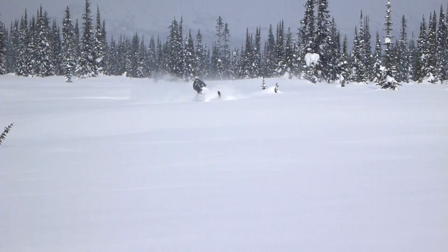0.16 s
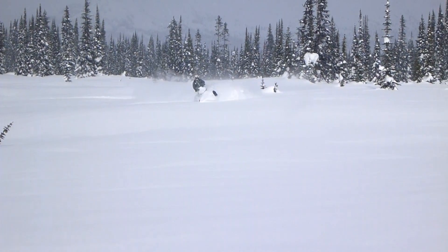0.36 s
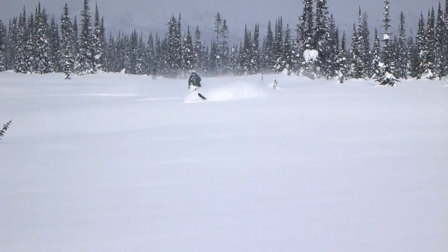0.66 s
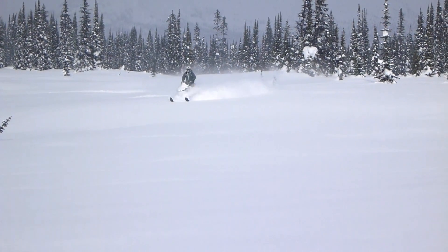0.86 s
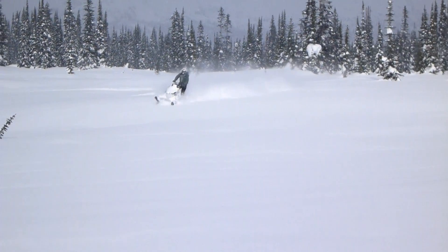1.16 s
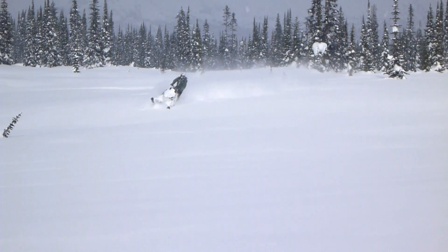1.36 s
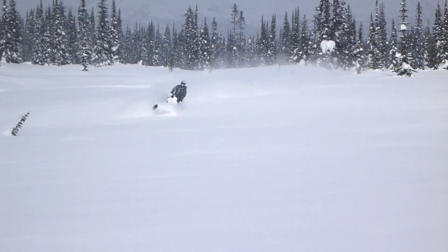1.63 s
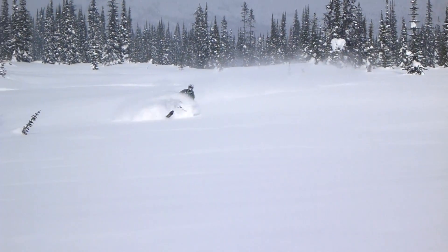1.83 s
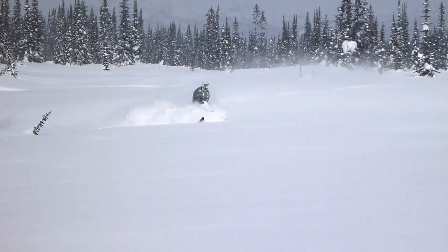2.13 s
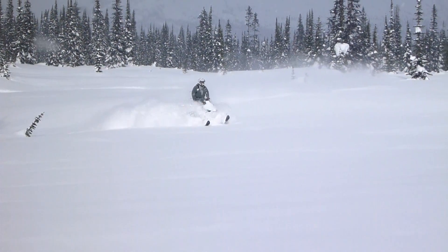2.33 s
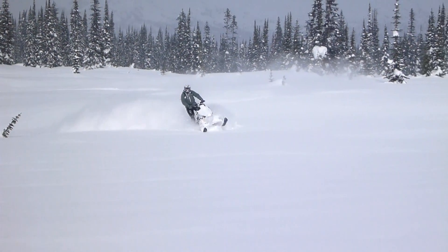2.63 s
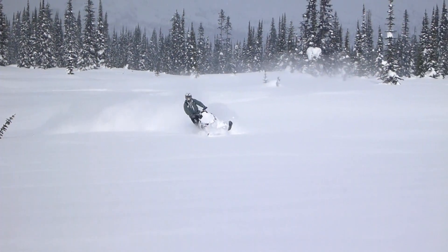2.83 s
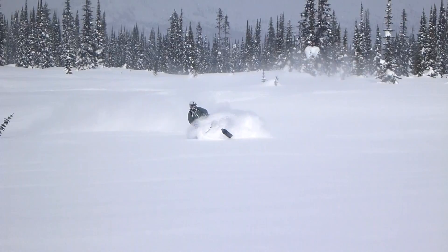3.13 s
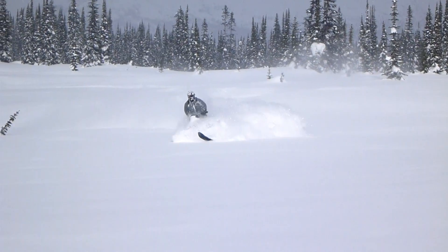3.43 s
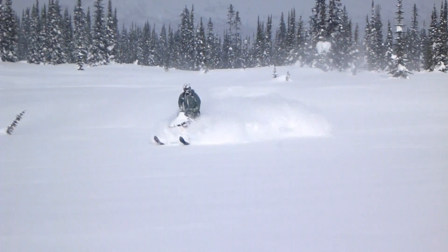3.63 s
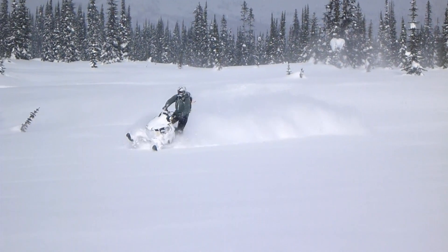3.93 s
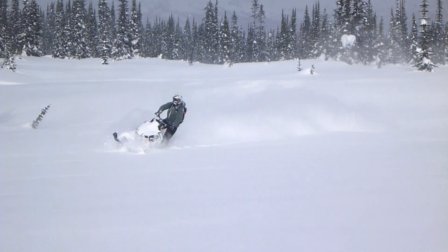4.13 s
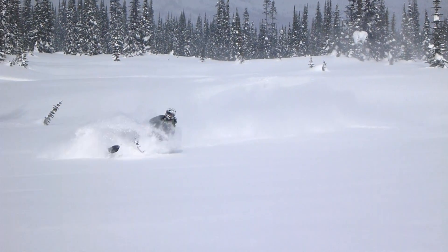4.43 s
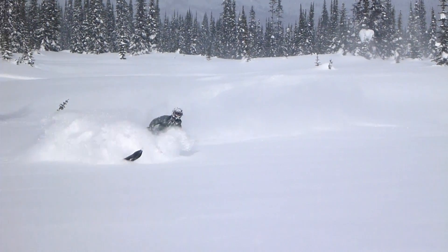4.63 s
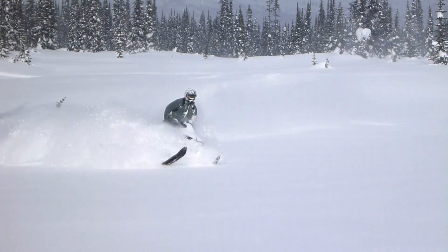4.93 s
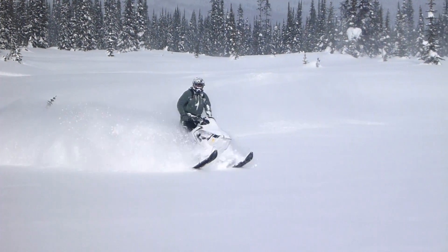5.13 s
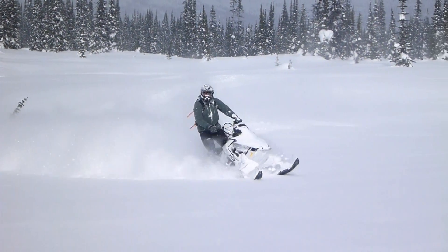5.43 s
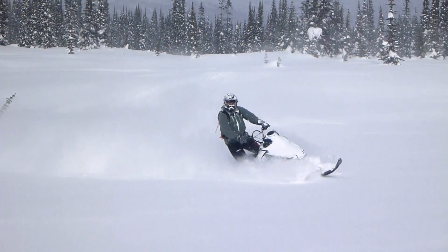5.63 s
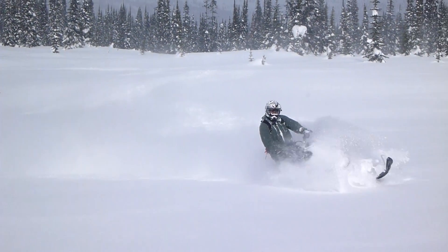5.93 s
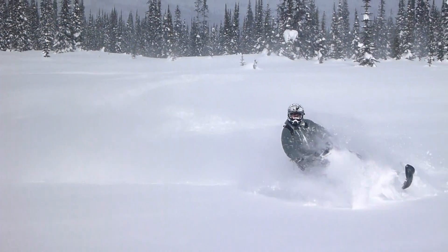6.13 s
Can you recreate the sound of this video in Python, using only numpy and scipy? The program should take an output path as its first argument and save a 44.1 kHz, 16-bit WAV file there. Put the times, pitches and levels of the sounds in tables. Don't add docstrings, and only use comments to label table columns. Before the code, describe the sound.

A two-cylinder snowmobile runs at nearly constant high revs in an open snowy field. It starts muffled beneath thumping wind, then barks out raspy and bright just after one second, dulls, and surges again near four and five seconds. Tree-line echoes trail the bursts. A handheld outdoor microphone catches buffeting gusts, and powder hisses softly as the machine gets close.

```python
import sys
import numpy as np
from scipy import signal
from scipy.fft import rfft, irfft, next_fast_len
from scipy.io import wavfile
from scipy.ndimage import uniform_filter1d

SR = 44100
rng = np.random.default_rng(int(sys.argv[2]) if len(sys.argv) > 2 else 0)


def unload_audio(sound):
    columns = np.transpose(np.atleast_2d(sound))
    steps = np.round(np.clip(columns, -1, 1) * 32767)
    wavfile.write(sys.argv[1], SR, steps.astype(np.int16))


def field_ratio(decibels):
    return 10 ** (np.asarray(decibels, dtype=float) / 20)


N = 276941

# time in seconds, load in dB.
TRACK_LOAD = [(0, -1), (1.1, 3), (1.5, -4), (2.4, -3), (2.6, 6), (3, 2.5), (3.4, 0.3), (3.7, 5.5),
              (4.2, -1.5), (5.3, 1.5), (5.6, 0.2), (6.28, 4)]


def evened(x):
    return x / np.sqrt(np.mean(x ** 2) + 1e-20)


def steadied(x):
    power = uniform_filter1d(uniform_filter1d(x ** 2, 3000), 3000)
    return x / np.sqrt(abs(power) + 1e-12)


def read(points, hz):
    f, value = np.transpose(points)
    return np.interp(np.log(hz + 1), np.log(f + 1), value)


def columns(rows):
    s, *values = np.transpose(rows)
    return [np.interp(np.arange(N) / SR, s, v) for v in values]


def peaks(rows, db, rise, fall, sag=0):
    step = 64
    t = np.arange(0, N + step, step)[:, None] / SR
    start, length = np.transpose(rows)[:2]
    before = rise * np.maximum(start - t, 0)
    after = fall * np.maximum(t - start - length, 0)
    each = db - before - after - sag * np.clip(t - start, 0, length)
    return np.interp(np.arange(N) / SR, t[:, 0], each.max(1))


def shaped(x, gain):
    size = next_fast_len(N + 8192)
    return irfft(rfft(x, size) * gain(np.fft.rfftfreq(size, 1 / SR)), size)[:N]


def coloured(points):
    return shaped(rng.standard_normal(N), lambda f: field_ratio(read(points, f)))


def causal(points):
    log_gain = np.log(field_ratio(read(points, abs(np.fft.fftfreq(4096, 1 / SR)))))
    return np.fft.ifft(np.exp(np.conj(signal.hilbert(log_gain)))).real[:2048]


def drift(hz, count=1):
    step = 64
    size = N // step + 2
    z = rfft(rng.standard_normal((count, size)))
    slow = irfft(z / (1 + (np.fft.rfftfreq(size, step / SR) / hz) ** 2), size)
    return np.array([np.interp(np.arange(N), np.arange(size) * step, evened(v)) for v in slow])


def add(mix, s, sound):
    part = mix[round(s * SR):][:len(sound)]
    part += sound[:len(part)]


def engine():
    # time in seconds, firing rate in Hz.
    speed = [(0, 268.9), (.58, 282.9), (1.14, 280.5), (1.31, 283), (1.45, 283), (1.78, 285.3),
             (2.33, 269.3), (2.55, 285.6), (2.76, 287.3), (3.34, 274.9), (3.92, 286), (4.1, 285.3),
             (4.36, 279.7), (4.85, 270.8), (5.02, 281.2), (5.28, 285.5), (5.88, 277.7), (6.28, 280.6)]
    # time in seconds, share 0-1.
    unsteadiness = [(0, .7), (1.1, .6), (1.25, .05), (1.75, .08), (1.98, .75), (2.45, .9), (2.55, .15), (3, .3),
                    (3.5, .5), (3.8, .05), (4.35, .08), (4.5, .8), (4.9, .8), (5, .05), (5.5, .1), (6.28, .2)]
    turns = np.cumsum(columns(speed)[0]) / SR
    burble = columns(unsteadiness)[0]
    scatter = drift(4.7, count=14)
    beating = .6 * burble * drift(32, count=16)
    sputter = field_ratio((.7 + 5 * burble ** 2) * drift(130)[0])
    band_levels_db, fourth_db, seventh_db, hum_levels_db = order_levels()
    bark = exhaust(turns, burble, scatter, beating, sputter, band_levels_db, fourth_db, seventh_db)
    hum = shell_hum(turns, beating, hum_levels_db)
    return bark, hum + crank(turns, scatter)


def exhaust(turns, burble, scatter, beating, sputter, band_levels_db, fourth_db, seventh_db):
    # frequency in Hz, level in dB.
    open_outlet = [(200, -25.5), (1100, 10.5), (1420, 7.5), (1700, -0.5), (2270, -6), (2550, -3.5),
                   (3700, -2), (4500, -8.5), (5400, -10), (8050, -27), (9600, -31), (10900, -22),
                   (15600, -46.5)]
    firing = np.round(turns).astype(int)
    uneven, late = rng.standard_normal((firing[-1] + 1, 2)).T
    strength = 1 + .05 * uneven[firing] + .04 * (-1.) ** firing
    jittered = turns + .002 * late[firing] + .004 * drift(30)[0]
    orders = firing_orders(jittered, burble, scatter, beating, sputter)
    pulses = sum(orders[k] for k in orders if k not in (4, 7))
    colour = causal(open_outlet)
    outlet = signal.oaconvolve(-strength * evened(pulses) + gas_jet(turns, sputter), colour)[:N]
    bark = sum(field_ratio(db) * steadied(band) for db, band in zip(band_levels_db, outlet_bands(outlet)))
    for k, db in (4, fourth_db), (7, seventh_db):
        bark += field_ratio(db) * steadied(signal.oaconvolve(-strength * orders[k], colour)[:N])
    return bark


def firing_orders(jittered, burble, scatter, beating, sputter):
    orders = {}
    for k in range(4, 55):
        beats = (1 + beating[k - 2]) / np.sqrt(1 + burble ** 2) if k < 10 else sputter
        wave = np.cos(2 * np.pi * k * jittered + beating[min(k + 6, 15)]) * beats
        waver_db = min(.08 * k, 1.7) * scatter[min(k, 5 + k // 7)]
        orders[k] = wave * field_ratio(waver_db)
    return orders


def gas_jet(turns, sputter):
    puff = np.exp(-(turns % 1) / .5) * rng.standard_normal(N) * sputter
    return .5 * shaped(puff, lambda f: 1 / np.sqrt(1 + (4000 / (f + 1)) ** 2))


def outlet_bands(outlet):
    # delay in ms, drift of the delay in ms, level in dB.
    bounces = [(.2, .07, -11), (.6, .12, -12), (1.8, .1, -10), (2.7, .3, -12)]

    def below(x, edge_hz):
        return shaped(x, lambda f: 1 / (1 + (f / edge_hz) ** 16))

    bright = outlet.copy()
    for (ms, drift_ms, db), sway in zip(bounces, drift(2.4, count=4)):
        delay = abs(ms + drift_ms * sway) * SR / 1000
        bright += field_ratio(db) * np.interp(np.arange(N) - delay, np.arange(N), outlet)
    low, mid, high = below(outlet, 1900), below(outlet, 2900), below(bright, 7850)
    return low, mid - low, high - below(bright, 2900), bright - high


def shell_hum(turns, beating, levels_db):
    lagged = turns - 0.1
    hum = sum(field_ratio(db) * np.sin(2 * np.pi * (k + 1) * lagged + 0.59 * k * beating[k])
              for k, db in enumerate(levels_db))
    return np.sqrt(2) * hum


def crank(turns, scatter):
    half = sum(np.cos(np.pi * k * turns + k * k) * field_ratio(2.1 * scatter[k // 2]) / k ** 0.34
               for k in range(3, 18, 2))
    return field_ratio(-51 + 2.3 * columns(TRACK_LOAD)[0]) * evened(half)


def order_levels():
    # time in seconds, level in dB, lean towards the second order in dB.
    shell = [(0, -48, 1), (.9, -44.5, 4.5), (1.14, -42.5, 7), (1.3, -33.5, -1.5), (1.45, -49, 12.5),
             (2.04, -39, 11.5), (2.4, -40, -7), (2.76, -35.5, 6.5), (3.1, -41.5, 4), (3.75, -45.5, 9.5),
             (3.86, -38.5, 9.5), (4.07, -43, -6.5), (4.35, -43.5, 13.5), (4.56, -33, 2), (4.9, -34, -15),
             (5, -26.5, 8), (5.4, -35, -4), (6.28, -34, 3)]
    # start in seconds, length in seconds, level in dB.
    rings = [
        [(1.27, 0.047, -36), (1.98, 0.14, -30.5), (3.85, 0.026, -29.5), (4.05, 0.063, -37), (4.47, .1, -35.5), (4.99, 0.07, -26), (5.12, .1, -28.5), (5.75, .3, -39.5)],
        [(1.2, 0.058, -26), (2.02, 0.02, -25.5), (2.55, 0.15, -32), (3.6, 0.2, -35.5), (3.85, 0.049, -26), (5, 0.11, -22)],
        [(1.42, 0.22, -27.5), (2.55, 0.24, -38.5), (3.85, 0.068, -29), (4.25, .12, -22), (5.42, .14, -34.5), (5.6, .3, -41), (5.95, .15, -44), (6.18, .1, -38.5)],
    ]
    shell_db, lean_db = columns(shell)
    bands_db = outlet_levels(shell_db)
    bark_db, whine_db = bands_db[:2]
    ring_db = [peaks(rows, np.transpose(rows)[2], 167, 167) for rows in rings]
    second_db = shell_db + lean_db
    third_db = np.maximum(.6 * bark_db + 0.62 * shell_db + 3.1, ring_db[0])
    fourth_db = np.maximum(bark_db - 6.5, second_db - 8.5)
    fourth_db = np.maximum(fourth_db, ring_db[1])
    seventh_db = np.maximum(whine_db + 2.5, ring_db[2])
    return bands_db, fourth_db, seventh_db, (shell_db, second_db, third_db)


def outlet_levels(shell_db):
    # start in seconds, length in seconds, bark in dB,
    # snow cover in dB, pipe aim in dB.
    openings = [(0, 0.35, -44.5, 18, 2), (1.193, 0.093, -23.5, 6, -8), (1.279, 0.099, -17.5, 11.5, -5),
                (1.402, .5, -23, 6, -2), (1.506, 0.08, -21.5, 6, -2), (1.871, 0.053, -26.5, 2, -6),
                (1.959, .11, -23.5, 13.5, -5), (2.11, 0.44, -26.5, 33, 2), (2.566, 0.21, -30.5, 19.5, 1.5),
                (2.771, .35, -41, 15.5, 2.5), (3.624, .16, -42, 14, 2), (3.84, 0.26, -21.5, 6, -6),
                (4.087, .08, -22, 7, -5), (4.177, 0.2, -24.5, 5, -3.5), (4.226, 0.028, -21.5, 11.5, -0.5),
                (4.33, .05, -24.5, 8, 4.5), (4.388, 0.035, -35, -11.5, -4.5), (4.46, 0.07, -34, 1.5, -6.5),
                (4.534, .025, -27, 12, -7), (4.603, 0.44, -29.5, 30, 8.5), (4.989, .1, -19, 14, -0.5),
                (5.122, 0.12, -22.5, 6.5, -8.5), (5.279, .19, -33.5, -1.5, -10),
                (5.496, 0.086, -35, 11.5, -1.5)]
    # start in seconds, length in seconds, sizzle in dB.
    jets = [(1.25, .02, -33.5), (1.389, 0.015, -35.5), (1.75, 0.028, -33.5), (1.888, .02, -37.5),
            (3.825, 0.047, -25.5), (3.923, 0.039, -28.5), (4.165, 0.025, -34), (4.385, .03, -42),
            (5.2, 0.076, -33), (5.314, 0.07, -32)]
    clear, bury, shut, tail = 418, 219, 520, 120
    strength, cover, aim = np.transpose(openings)[2:]
    sag = 1.67 * cover

    def opened(db, sag, fall=bury):
        return peaks(openings, db, clear, fall, sag)

    bark = np.maximum(opened(strength, sag), shell_db - 12)
    whine = np.maximum(opened(strength - .7 * cover + aim, sag / 2), -58.5)
    crack = np.maximum(opened(strength - cover, 0, shut), -60)
    crack = np.maximum(crack, opened(strength - cover - 11, 0, tail))
    sizzle = -30 + 1.06 * (crack + 30) - 9
    sizzle = np.maximum(sizzle, peaks(jets, np.transpose(jets)[2], shut, bury))
    wander_db = np.c_[[0.65, 3, 1.5, 3]]
    return np.array([bark, whine, crack, sizzle]) + wander_db * drift(7.9, count=4)


def trees(x):
    # delay in seconds, level in dB.
    echoes = [
        (.12, -31),
        (0.211, -14),
        (.33, -19.5),
    ]
    taps = np.zeros(SR)
    for s, db in echoes:
        smear = rng.standard_normal(300) * np.hanning(300) / np.sqrt(112)
        add(taps, s, field_ratio(db) * smear)
    t = np.arange(SR) / SR
    taps += field_ratio(-53.5 - 60 * t / 4.2) * rng.standard_normal(SR) * (t > .05)
    return shaped(signal.oaconvolve(x, taps)[:N], lambda f: 1 / (1 + (f / 2500) ** 2))


def wind():
    # frequency in Hz, level in dB per Hz.
    rumble_tone = [(12, -60), (25, -30), (50, -10), (118, 0), (230, -4.5), (340, -9), (600, -90)]
    # frequency in Hz, level in dB per Hz.
    flutter_tone = [(150, -9), (280, -8), (500, -1.5), (900, -11), (1600, -15), (3000, -30.5)]
    # start in seconds, length in seconds, rumble in dB, flutter over rumble in dB.
    gusts = [(0, .012, -32.5, -5), (0.178, 0.047, -34.5, -6), (0.402, 0.16, -31, -5.5),
             (0.715, 0.019, -23, 0), (.762, .015, -26.5, -3), (0.797, 0.029, -26, -4),
             (0.852, 0.03, -25.5, -2.5), (1.067, 0.029, -36, -18.5), (1.202, 0.16, -33.5, 1),
             (1.75, .22, -49.5, -9), (2.004, 0.025, -34.5, -18), (2.24, 0.043, -38, -14),
             (2.35, 0.023, -30, -7), (2.446, 0.013, -30.5, -5.5), (2.582, 0.11, -36.5, -6),
             (2.72, 0.11, -44, -3), (2.951, 0.18, -45, -1), (3.154, 0.12, -31.5, -11),
             (3.25, 0.12, -38, -3), (3.44, .02, -34.5, -9), (3.538, 0.028, -35.5, -9),
             (3.67, 0.24, -42.5, .6), (4.435, .3, -42.5, -16), (4.8, 0.019, -37, -20), (4.879, .2, -41, 2),
             (5.531, 0.12, -42.5, 6), (5.729, .19, -44.5, 3.5), (6.102, 0.054, -28, -1),
             (6.196, 0.027, -20, 5.5), (6.27, .02, -20, 12)]
    rise, fall, wake = 320, 210, 45
    force, flap = np.transpose(gusts)[2:]
    rumble_db = np.maximum(peaks(gusts, force, rise, fall), -54.5)
    rumble_db = np.maximum(rumble_db, peaks(gusts, force - 14, 2 * wake, wake))
    flutter_db = np.maximum(peaks(gusts, force + flap, rise, fall), -57) - rumble_db
    lumps = np.clip(drift(24)[0], -2, 1.5)
    rumble = evened(coloured(rumble_tone) * field_ratio(3.5 * lumps))
    flutter = evened(coloured(flutter_tone) * field_ratio(5.5 * lumps))
    out = field_ratio(rumble_db) * (rumble + field_ratio(flutter_db - 3.5) * flutter)
    out = .45 * np.tanh(out / .45)
    eddies(out)
    return shaped(out, lambda f: 1 / (1 + (45 / (f + 1)) ** 2) / (1 + (f / 1500) ** 4))


def eddies(out):
    # time in seconds, peak in dB, frequency in Hz.
    pops = [(0.18, -12, 250), (0.38, -14, 138), (0.498, -11, 315), (0.713, -3, 131), (0.764, -3.5, 256),
            (0.863, -3.5, 215), (2.369, -23, 191.1), (3.437, -11, 134.5), (6.174, -23, 127.5),
            (6.196, 3, 179), (6.268, -8, 198)]
    for s, db, hz in pops:
        cycles = np.arange(0, 2.5, hz / SR)
        slap = np.tanh(3 * np.sin(2 * np.pi * cycles ** 1.1)) * np.exp(-cycles / 1.1)
        add(out, s, -field_ratio(db - 9) * slap)


def drive():
    # time in seconds, frequency in Hz, level in dB.
    hum = [(5.55, 223.7, -79), (5.56, 229, -35), (5.722, 221, -46), (5.976, 207.9, -42), (6.1, 211, -44.5)]
    hz, db = columns(hum)
    near = np.clip((np.arange(N) / SR - hum[0][0]) / 0.19, 0, 1)
    return near * np.sqrt(2) * field_ratio(db) * np.sin(2 * np.pi * np.cumsum(hz) / SR)


def spray():
    # start in seconds, length in seconds, level in dB.
    landings = [(5.861, 0.015, -37), (5.97, 0.011, -47), (6.008, .04, -42.5), (6.06, .045, -49),
                (6.205, 0.088, -41)]
    # frequency in Hz, level in dB per Hz.
    powder = [(2000, -25), (3000, 6), (3600, 5.5), (4500, -14), (5500, 2), (6500, -14), (11000, -14),
              (15700, -33)]
    grains = rng.standard_normal(N) * field_ratio(1.91 * drift(121.5)[0])
    hiss = shaped(grains, lambda f: field_ratio(read(powder, f)))
    return field_ratio(peaks(landings, np.transpose(landings)[2], 2200, 500)) * evened(hiss)


def ticks():
    # time in seconds, peak in dB.
    taps = [(0.0887, -40.5), (0.1271, -45), (0.6529, -44), (0.7694, -49)]
    out, t = np.zeros(N), np.arange(200) / SR
    for s, db in taps:
        add(out, s, field_ratio(db) * np.diff(rng.standard_normal(201)) * np.exp(-t / 0.0038))
    return out


def roar():
    # frequency in Hz, level in dB per Hz.
    roar_tone = [(200, -16), (500, 5), (850, 4), (1400, 3), (1950, 0), (2600, -5), (3500, -7),
                 (6000, -18.5), (10700, -21.5), (12700, -27), (15600, -32)]
    return field_ratio(-44 + 0.22 * drift(9)[0]) * evened(coloured(roar_tone))


def whirr():
    gate = np.exp(1.2 * np.cos(2 * np.pi * 29.6 * np.arange(N) / SR))
    band = shaped(rng.standard_normal(N), lambda f: 1 / (1 + ((f - 12700) / 400) ** 2))
    return field_ratio(-75) * evened(gate * band)


def ducking(loud):
    power_db = 10 * np.log10(abs(uniform_filter1d(loud ** 2, 2000)) + 1e-12)
    recovery_db = np.arange(N) * 8.9 / SR
    held_db = np.maximum.accumulate(power_db + recovery_db) - recovery_db
    over_db = np.maximum(held_db + 19.5, 0)
    return field_ratio(-.7 * uniform_filter1d(over_db, 2000))


def scene():
    bark, hum = engine()
    loud = bark + trees(bark) + hum + wind()
    background = field_ratio(columns(TRACK_LOAD)[0]) * roar() + whirr()
    return (loud + drive() + spray() + ticks() + ducking(loud) * background)[None]


def top_cut(x):
    return signal.sosfilt(signal.butter(12, 15730, fs=SR, output="sos"), x)


def record(dry):
    # frequency in Hz, width in Hz, depth 0-1.
    notches = [(2930, 850, .9), (4750, 600, .55), (7850, 400, .6), (11680, 1400, .95)]
    for hz, width, depth in notches:
        pole, turn = np.exp(-np.pi * width / SR), 2 * np.cos(2 * np.pi * hz / SR)
        zero = pole ** (1 - np.clip(depth, 0, 1))
        dry = signal.lfilter([1, -zero * turn, zero ** 2], [1, -pole * turn, pole ** 2], dry)
    mix = signal.oaconvolve(dry, signal.firwin(401, 15650, fs=SR)[None], "same")
    return top_cut(mix)


dry = scene()
out = record(dry)
unload_audio(out)
```